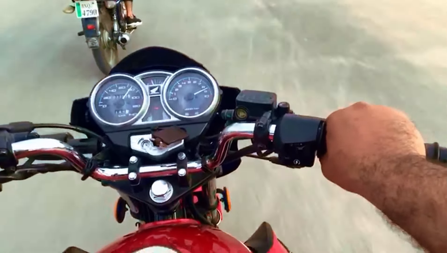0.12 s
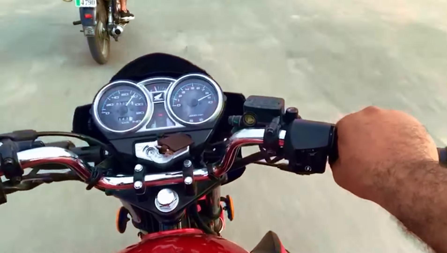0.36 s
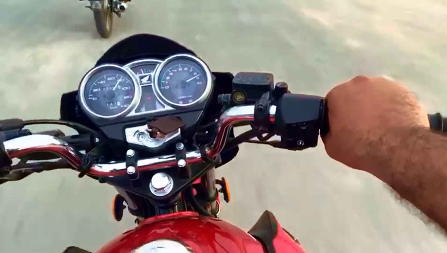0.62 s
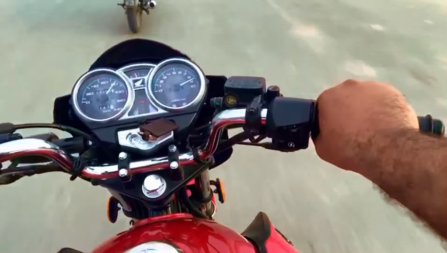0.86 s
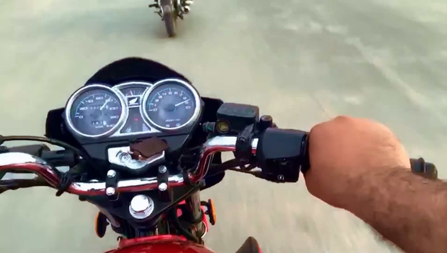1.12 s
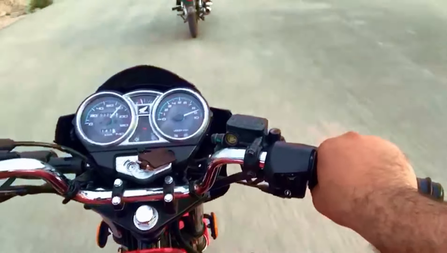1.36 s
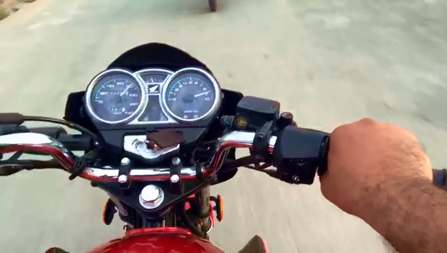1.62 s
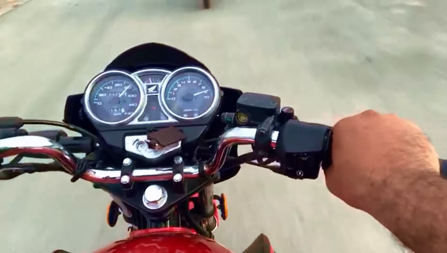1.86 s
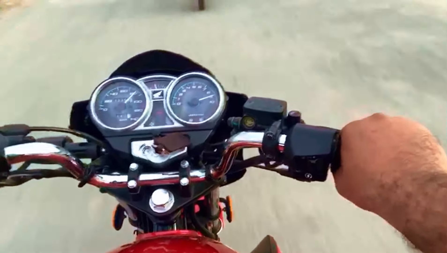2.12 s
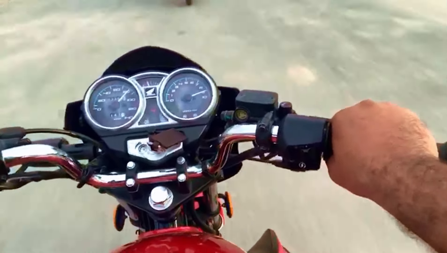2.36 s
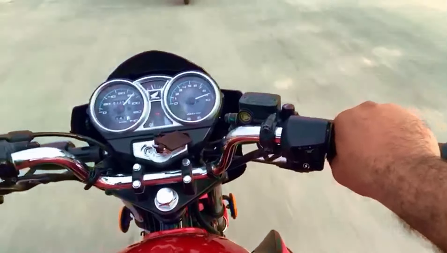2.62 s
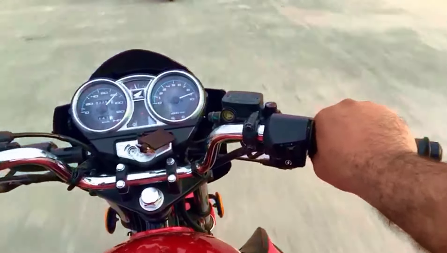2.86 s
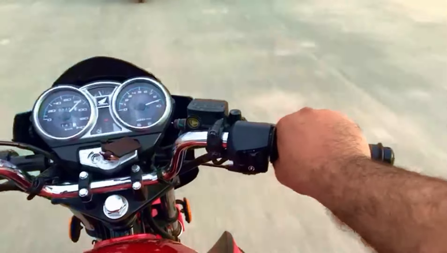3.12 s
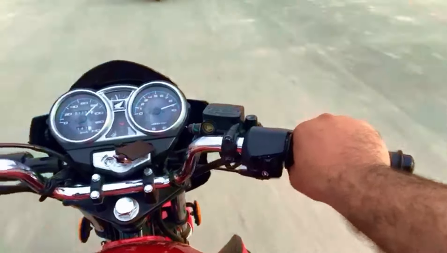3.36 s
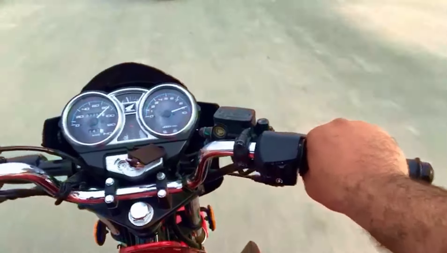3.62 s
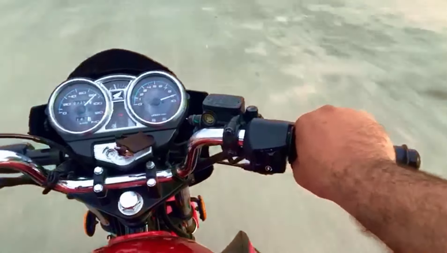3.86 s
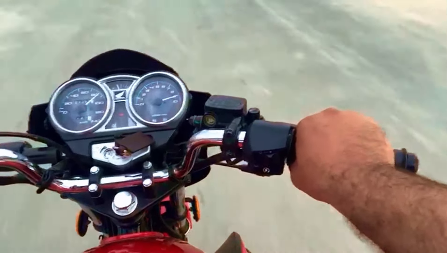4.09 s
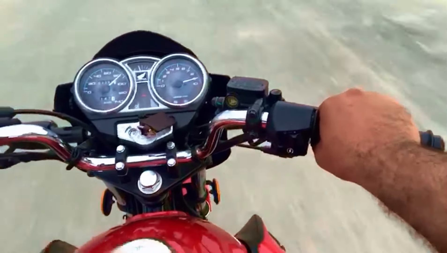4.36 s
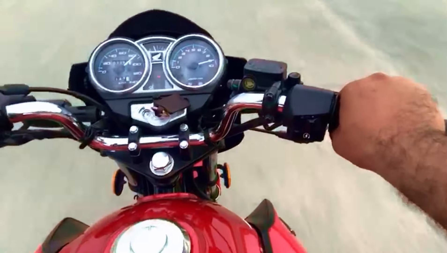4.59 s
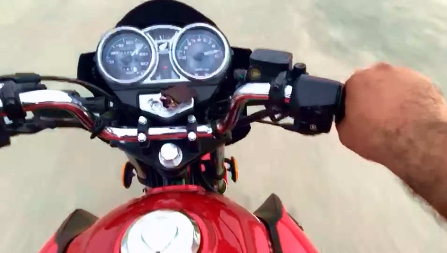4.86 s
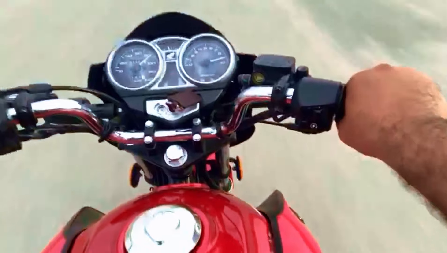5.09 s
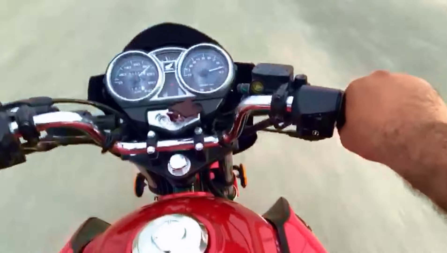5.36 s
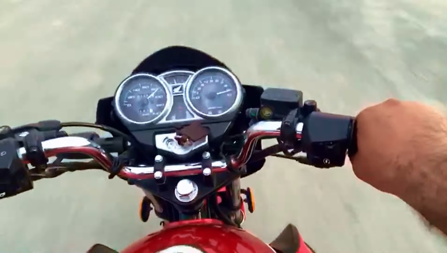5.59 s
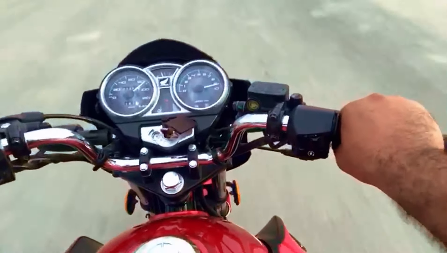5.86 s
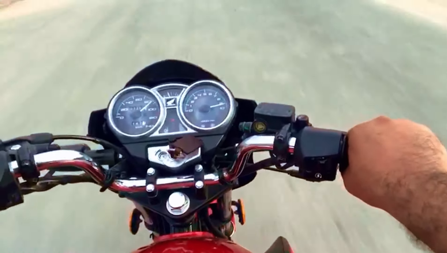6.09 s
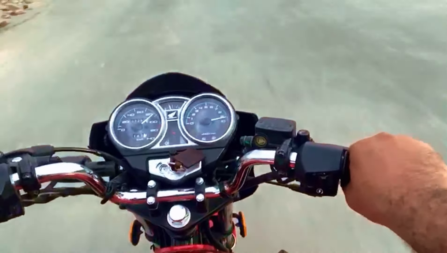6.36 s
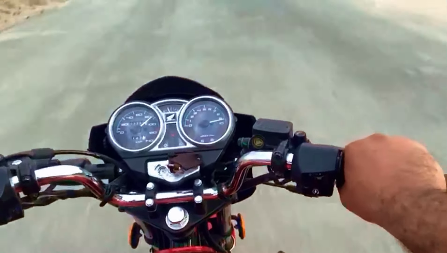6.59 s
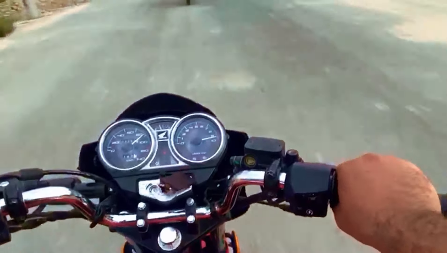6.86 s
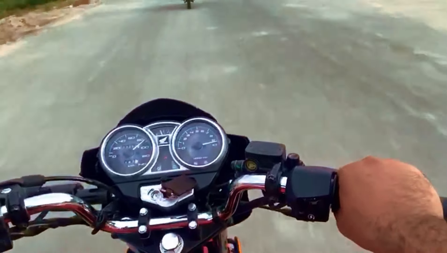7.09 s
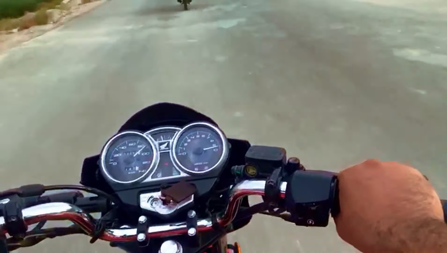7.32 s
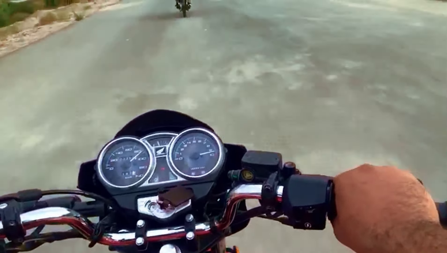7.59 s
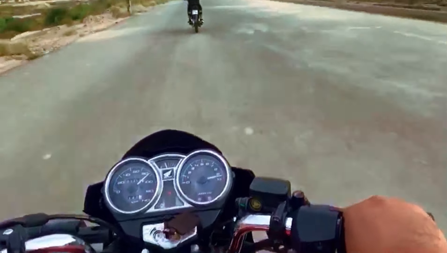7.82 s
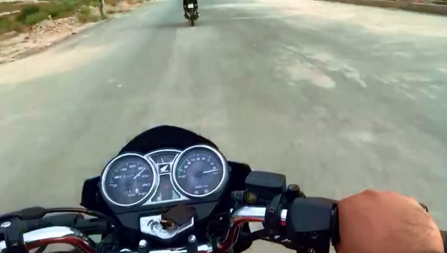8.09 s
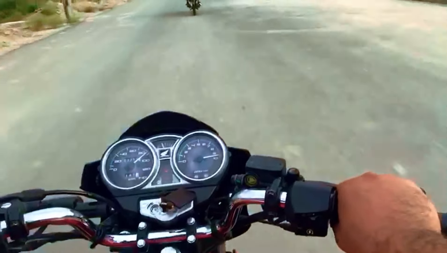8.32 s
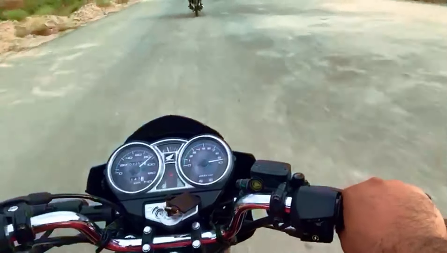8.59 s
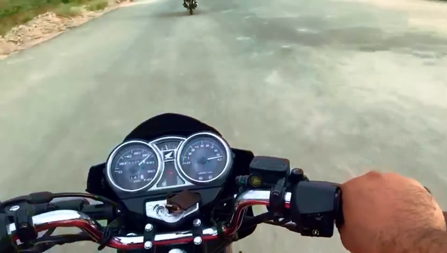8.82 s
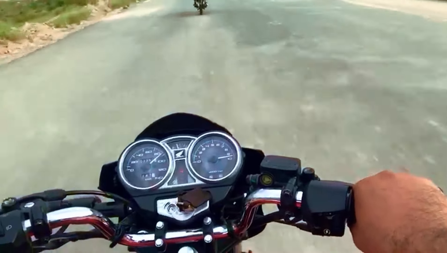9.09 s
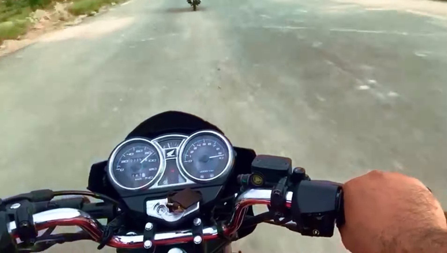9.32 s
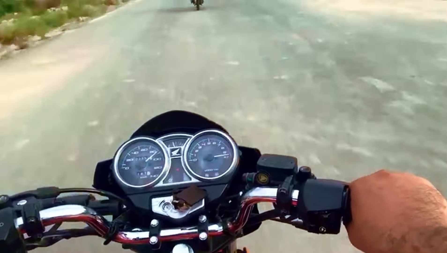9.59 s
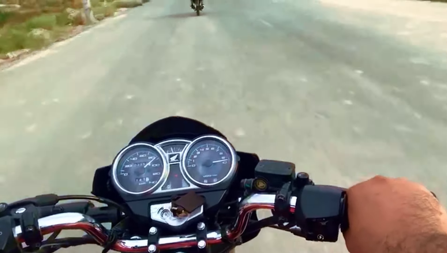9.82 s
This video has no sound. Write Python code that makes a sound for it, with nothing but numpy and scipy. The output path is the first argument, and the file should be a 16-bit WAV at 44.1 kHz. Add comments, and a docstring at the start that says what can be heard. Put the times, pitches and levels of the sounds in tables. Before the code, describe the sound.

A small single-cylinder motorcycle rides an open road, heard through a bare microphone on the rider, close and dry with no echo. From 0 to 0.3 s the air is calmer and the engine is clear: a low buzzing hum, throaty exhaust rasp and bright metallic clatter. At about 0.33 s wind slams in and covers most of it. From then on there is dense low rumble, irregular heavy thuds several times a second, a ragged fluttering roar, and small dry ticks and snaps, broken by very brief lulls. The engine drone climbs slightly and smoothly in pitch throughout, sinking further under the wind. Buffeting thumps hard around 4.6 s, and a brighter, stronger blast with a sharp snap arrives around 8.1 to 8.5 s. It eases a little, thuds again near 9 s, and continues rough to the end at about 10 s. Loud peaks sound flattened and overloaded, with dull extreme treble.

```python
"""On an open road, from an unshielded microphone on the rider of a small single-cylinder motorcycle.
At first the bright engine clatter is clear and the air calmer; within a third of a second it turns rough.
Then wind covers the ride: low rumble and heavy thuds, a ragged roar, eddies and ticks snapping at the port.
The engine hum, a stack of orders of the firing rate, slowly climbs and fades under it as speed is gained.
The wind is filtered noise in spurts, strongest a little after 8 s; a fast limiter squashes the peaks."""
import sys
import numpy as np
from scipy import signal
from scipy.fft import rfft, irfft, next_fast_len
from scipy.io import wavfile
from scipy.ndimage import uniform_filter1d, minimum_filter1d

SR = 44100
rng = np.random.default_rng(int(sys.argv[2]) if len(sys.argv) > 2 else 0)


def decibels_to_gain(level_db):
    """Convert a level in decibels to a linear amplitude gain (20 dB per decade)."""
    exponent = np.asarray(level_db, float) / 20
    return 10 ** exponent


def output_pcm(signal):
    """Save a mono or channel-first signal as 16-bit PCM at the path in sys.argv[1].

    Samples are clipped to [-1, 1] before scaling.
    """
    pcm = np.clip(np.atleast_2d(signal).T, -1, 1) * 32767
    wavfile.write(sys.argv[1], SR, np.round(pcm).astype(np.int16))


N = 438794
t = np.arange(N) / SR


def evened(x):
    """Scales to rms 1."""
    return x / np.sqrt(np.mean(x ** 2) + 1e-20)


def curve(rows):
    """Each column of a table, after its times in s, as a value for every sample."""
    s, *columns = np.transpose(rows)
    return [np.interp(t, s, c) for c in columns]


def colour(x, points, lo_hz=0, hi_hz=1e5):
    """Causal minimum-phase filter with a given spectrum, sloping off outside lo..hi; white noise stays at rms 1."""
    hz = np.abs(np.fft.fftfreq(16384, 1 / SR)) + 1
    f, db = np.transpose(points)
    gain = decibels_to_gain(np.interp(np.log(hz), np.log(f), db))
    gain = gain / (1 + (lo_hz / hz) ** 3) / (1 + (hz / hi_hz) ** 3)
    log_gain = np.log(np.maximum(gain, 1e-7))
    taps = np.fft.ifft(np.exp(np.conj(signal.hilbert(log_gain)))).real[:8192]
    return signal.oaconvolve(x, taps / np.linalg.norm(taps))[:N]


def flutter(lo_hz, hi_hz, slope):
    """Random wobble of rms 1 with rates between lo and hi, the slow ones stronger."""
    hz = np.fft.rfftfreq(N, 1 / SR) + 1e-3
    shape = hz ** -slope / (1 + (lo_hz / hz) ** 4) / (1 + (hz / hi_hz) ** 2)
    return evened(irfft(rfft(rng.standard_normal(N)) * shape, N))


def spells(start_length, heights, edge_s):
    """Plateaus of the given heights with soft edges."""
    steps = np.zeros(N + 1)
    for (s, length), height in zip(start_length, heights):
        start, end = min(round(s * SR), N), min(round((s + length) * SR), N)
        steps[start:end] += height
    edge = max(round(edge_s * SR), 1)
    return uniform_filter1d(uniform_filter1d(steps[:N], edge), edge)


def scattered(per_s, spread_db):
    """Random moments after the calmer start, each with a random lift of rms spread_db."""
    draw = rng.random((round(per_s * N / SR), 2))
    moments = .33 + draw[:, 0] * (N / SR - .4)
    lifts_db = spread_db * (2 * draw[:, 1] - 1) * np.sqrt(3)
    return zip(moments, lifts_db)


def hum(rate, turns):
    """Clean orders of the firing rate; a panel lifts each order that passes through its resonance."""
    # orders: multiple of the firing rate, level_db
    orders = [(1, -4), (2, 1), (3, -8), (4, -4), (5, -10), (6, -12), (7, -10), (9, -18), (10, -19),
              (13, -18), (15, -18)]
    # panel resonance: pitch_hz, width_hz, lift_db
    panel_hz, width_hz, lift_db = (335, 5, 9)
    out = np.zeros(N)
    for k, db in orders:
        lift = lift_db / (1 + ((k * rate - panel_hz) / width_hz) ** 2)
        out += decibels_to_gain(db + lift) * np.cos(2 * np.pi * (k * turns + rng.random()))
    return np.sqrt(2) * out


def rasp(turns):
    """Exhaust rasp: gas leaves in one noisy puff a firing."""
    # exhaust level: time_s, level_db
    rasp_level = [(0, -26), (.3, -21.5), (.5, -30), (3, -31.5), (6, -36.5), (9.95, -37.5)]
    # exhaust colour: pitch_hz, density_db (per Hz)
    rasp_colour = [(250, -18), (500, 3), (900, 3), (1400, -3.5), (1800, -11), (2600, -42.5)]
    puffs = (.5 + np.exp(-(turns % 1) / 0.2)) * rng.standard_normal(N)
    return decibels_to_gain(curve(rasp_level)[0]) * colour(evened(puffs), rasp_colour)


def clatter(turns):
    """Valve and exhaust clatter: noise puffed out twice a firing, and a casing mode struck at each firing."""
    # clatter level: time_s, level_db
    clatter_level = [(0, -42), (.295, -42), (.33, -52), (.6, -55), (2, -58), (4, -61), (9.95, -61)]
    # clatter colour: pitch_hz, density_db (per Hz)
    clatter_colour = [(1200, -30), (2200, -7), (3200, -4), (3750, 1), (4200, -3), (5500, -2), (7200, 0),
                      (8400, -1.5), (11500, -1), (12500, -30)]
    # casing mode: pitch_hz, width_hz, level_db (against the puffs)
    ring_hz, width_hz, ring_db = (6300, 170, -9)
    first = .9 * np.exp(-(turns % 1) / .2)
    second = .5 * np.exp(-((turns + .5) % 1) / .2)
    puffs = (1 + first + second) * rng.standard_normal(N)
    knocks = np.exp(-(turns % 1) / .04) * (np.cos(2 * np.pi * ring_hz * t) + 3 * rng.standard_normal(N))
    r = np.exp(-np.pi * width_hz / SR)
    ring = signal.lfilter([1], [1, -2 * r * np.cos(2 * np.pi * ring_hz / SR), r * r], knocks)
    mixed = colour(evened(puffs), clatter_colour) + decibels_to_gain(ring_db) * evened(ring)
    return decibels_to_gain(curve(clatter_level)[0]) * mixed


def engine():
    """One cylinder whose firing rate climbs slowly, driving hum, rasp and clatter together."""
    # engine speed: time_s, firing_rate_hz, hum_level_db
    speed = [(0, 66.7, -24), (.5, 67.5, -26), (1, 67.9, -26), (2, 69.3, -29), (7, 73.7, -29),
             (8, 74.5, -31), (9.95, 75.6, -31)]
    rate, hum_db = curve(speed)
    turns = np.cumsum(rate) / SR  # counted in firings
    waver_db = 2.5 * flutter(1.5, 12, .4) - 1
    return decibels_to_gain(hum_db + waver_db) * hum(rate, turns) + rasp(turns) + clatter(turns)


def wind():
    """Drives in dB for rumble, roar, brightness and hiss: the air stream, plus gusts and surges, with lulls."""
    # air stream past the rider: time_s, strength_db (against the usual)
    stream = [(0, 3), (.3, 1), (.8, 1.5), (1.1, 0.5), (2.2, 1), (3.2, 2.5), (3.6, 2), (4.9, 0), (5.3, 3),
              (5.6, 0.5), (7.4, 2), (7.9, 1), (8.2, 7), (8.4, 5.5), (8.55, 1), (8.8, 2), (9.95, 2.5)]
    # gusts that tear at the port: start_s, length_s, roar_db, brightness_db
    gusts = np.array([(0.306, 0.11, -23.5, -45), (0.452, 0.058, -23.5, -44), (0.546, 0.063, -23, -43),
                      (0.712, 0.21, -24, -45), (0.99, 0.037, -13.5, -29.5), (1.141, 0.079, -26, -41),
                      (1.287, 0.083, -20.5, -43), (1.398, 0.039, -21.5, -43), (1.452, 0.032, -21, -33),
                      (1.492, 0.07, -15, -30), (1.724, 0.11, -17.5, -34), (1.872, 0.069, -20, -38),
                      (2.016, 0.063, -21, -36), (2.126, 0.036, -22, -46), (2.234, 0.068, -22, -42),
                      (2.365, 0.069, -23, -47), (2.532, 0.045, -20.5, -31), (2.69, 0.035, -18.5, -36),
                      (2.828, 0.11, -20.5, -34), (2.968, 0.12, -22.5, -35), (3.113, 0.058, -21.5, -34),
                      (3.18, 0.093, -20.5, -39), (3.328, 0.058, -19, -32), (3.429, 0.052, -23, -39),
                      (3.731, 0.057, -17, -28), (4.057, 0.053, -18, -33), (4.245, 0.032, -28, -42),
                      (4.52, 0.043, -25, -45), (4.608, 0.044, -24, -52), (4.69, 0.026, -22, -46),
                      (4.936, 0.04, -16.5, -34), (5.095, 0.079, -21.5, -40), (5.358, 0.068, -27, -38),
                      (5.727, 0.055, -19.5, -30), (5.813, 0.035, -17.5, -31.5), (5.957, 0.04, -24.5, -39),
                      (6.021, 0.069, -28, -43), (6.237, 0.14, -23, -33.5), (6.474, 0.055, -20.5, -33.5),
                      (6.73, 0.07, -23.5, -38), (6.865, 0.047, -20.5, -34), (6.958, 0.063, -24, -38),
                      (7.126, 0.065, -20, -33), (7.377, 0.036, -20, -30), (7.513, 0.047, -20.5, -32),
                      (7.612, 0.032, -24, -37), (7.767, 0.051, -14, -27), (7.841, 0.52, -21, -30.5),
                      (8.401, 0.024, -15.5, -27), (8.622, 0.029, -21.5, -36), (8.749, 0.056, -21, -34),
                      (8.892, 0.061, -25, -37), (8.991, 0.026, -23.5, -41), (9.061, 0.021, -21, -38),
                      (9.184, 0.048, -18, -25.5), (9.356, 0.055, -25, -44), (9.439, 0.064, -19.5, -33),
                      (9.59, 0.064, -28.5, -46), (9.805, 0.061, -26, -42)])
    # surges of rumble: start_s, length_s, rumble_db
    surges = np.array([(0.229, 0.034, -14), (0.32, 0.106, -4), (0.456, 0.04, -7), (0.54, 0.32, -12.5),
                       (0.873, 0.156, -14), (1.148, 0.09, -9.5), (1.324, 0.045, -11), (1.425, 0.167, -13),
                       (1.715, 0.11, -23), (1.86, 0.062, -12), (2.017, 0.092, -18), (2.352, 0.12, -13),
                       (2.68, 0.078, -14), (2.837, 0.034, -21), (2.986, 0.182, -13), (3.326, 0.044, -17),
                       (3.421, 0.021, -14), (3.614, 0.056, -15), (3.728, 0.032, -16), (4.15, 0.046, -17),
                       (4.267, 0.026, -14), (4.329, 0.03, -16), (4.435, 0.054, -16), (4.536, 0.037, -10),
                       (4.626, 0.039, -5), (4.856, 0.041, -21), (5.004, 0.048, -15.5), (5.114, 0.054, -7),
                       (5.216, 0.076, -16.5), (5.334, 0.136, -14.5), (5.556, 0.026, -7),
                       (5.762, 0.086, -17), (5.87, 0.11, -17), (6.144, 0.29, -12), (6.51, 0.03, -16),
                       (6.622, 0.05, -17), (6.74, 0.092, -16), (6.863, 0.038, -12), (6.927, 0.1, -11),
                       (7.13, 0.078, -11.5), (7.288, 0.084, -19), (7.39, 0.032, -15), (7.576, 0.082, -13),
                       (7.727, 0.1, -24), (8.008, 0.11, -20), (8.257, 0.134, -13), (8.47, 0.088, -13),
                       (8.61, 0.044, -19), (8.724, 0.087, -13), (9.018, 0.073, -10.5), (9.217, 0.084, -14),
                       (9.35, 0.032, -19), (9.43, 0.023, -9), (9.546, 0.078, -13.5), (9.75, 0.048, -10),
                       (9.91, 0.03, -7)])
    # lulls, when the stream leaves the port: start_s, length_s, change_db (a few are lifts)
    lulls = np.array([(0.509, 0.028, -2), (1.046, 0.072, -1), (1.242, .04, 0), (1.58, .035, -5),
                      (1.666, 0.034, -1.5), (1.828, 0.032, -4.5), (1.96, .03, 4.5), (2.086, 0.035, -6),
                      (3.32, 0.038, 2), (3.834, 0.026, -5), (4.134, 0.038, -7), (4.201, 0.04, -4),
                      (4.564, 0.026, -4.5), (4.8, 0.032, -7), (4.907, .025, -2), (5.153, 0.023, -9),
                      (5.544, 0.027, -1), (5.584, 0.016, -2), (6.116, 0.045, -1.5), (6.45, 0.045, -1),
                      (6.719, 0.016, -10), (6.902, .03, -5), (7.198, .035, -8), (8.52, 0.048, -2.5),
                      (8.68, 0.024, -4), (9.1, .02, -4), (9.398, 0.034, -5.5), (9.721, 0.028, -7)])
    # usual drive in dB, and dB gained for each dB of stream strength
    rumble_law, roar_law = (-15.5, 0.31), (-22, 1.05)
    bright_law, hiss_law = (-41.5, 1.8), (-59.5, 2.2)
    gust_edge_s, surge_edge_s, lull_edge_s = 0.0094, 0.027, .012
    rumble_share, bright_share = 0.49, 1.6  # of each lull's change

    strength_db = curve(stream)[0]
    lull_db = spells(lulls[:, :2], lulls[:, 2], lull_edge_s)

    def level(law, rows, column, edge_s):
        """Steady stream and its spells, added as amplitudes."""
        steady = decibels_to_gain(law[0] + law[1] * strength_db)
        return 20 * np.log10(steady + spells(rows[:, :2], decibels_to_gain(rows[:, column]), edge_s))

    rumble_db = level(rumble_law, surges, 2, surge_edge_s) + rumble_share * lull_db
    roar_db = level(roar_law, gusts, 2, gust_edge_s) + lull_db
    bright_db = level(bright_law, gusts, 3, gust_edge_s) + bright_share * lull_db
    calm_db = 20 * np.clip((.33 - t) * 20, 0, 1)  # the hiss sets in as the air turns rough
    hiss_db = hiss_law[0] + hiss_law[1] * strength_db - calm_db
    return rumble_db, roar_db, bright_db, hiss_db


def thuds():
    """Heavy buffets: each a low pressure swing that grows, then dies within about three cycles."""
    # buffets: start_s, level_db, swing_hz
    buffets = [(0.325, -2, 124), (0.452, 0, 196), (0.549, -5, 116), (0.984, 3, 66), (1.149, -8, 143),
               (1.319, 3, 137), (1.419, -2, 141), (1.638, -1, 101), (1.871, -7, 61.9), (2.029, -1, 58.3),
               (2.378, -2, 59), (2.83, 1.5, 155), (2.985, -4, 65.6), (3.334, 2.5, 102), (3.415, 0, 62.4),
               (3.605, 2, 69), (3.704, -6, 72), (3.84, -1, 54.7), (3.96, 3, 160), (4.182, 2, 69),
               (4.256, -8, 75.4), (4.622, 6, 70.3), (4.702, 1, 68.3), (4.852, -6, 51.5), (5.116, -4, 83.4),
               (5.33, 0, 62), (5.557, -2, 66.3), (5.757, -1, 62.5), (6.312, -6, 70.5), (6.491, -7, 70.0),
               (6.616, -15, 80.7), (6.731, 3, 202), (6.854, -2, 135), (7.127, -3, 161), (7.238, -12, 64),
               (7.389, 3, 93), (7.561, -6, 128), (7.718, -6, 65), (8.582, -7, 57), (8.732, -10, 64),
               (8.888, -3, 59.2), (9.05, 6, 71), (9.197, -14, 51.1), (9.425, -3, 96), (9.537, -7, 54.7),
               (9.748, -12, 62.3)]
    out = np.zeros(N)
    for s, level_db, hz in buffets:
        u = np.arange(int(3.2 * SR / hz)) * hz / SR  # in cycles
        swing = np.sin(2 * np.pi * u) * u * np.exp(-u / 0.71)
        part = out[round(s * SR):][:len(u)]
        part += 1.5687 * decibels_to_gain(level_db) * swing[:len(part)]
    return out


def rumble(spurts, rumble_db):
    """Large slow vortices heard as lumpy low noise, with the single heavy thuds."""
    # rumble colour: pitch_hz, density_db (per Hz)
    rumble_colour = [(11, -17), (18, -39.5), (42, 0.5), (64, -0.5), (285, -9.5), (400, -13), (520, -36.5),
                     (880, -120)]
    slow_spurts = uniform_filter1d(spurts, size=600)
    lumps_db = rumble_db - 5.0 + 3.87 * flutter(15.3, 43, 0.13) + 1.7 * slow_spurts
    return decibels_to_gain(lumps_db) * colour(rng.standard_normal(N), rumble_colour, hi_hz=229.0) + thuds()


def eddies():
    """Pressure envelopes of eddies bursting at the port, for middle and treble: quick swell, slower fall."""
    # bursts: time_s, middle_db, treble_db (strengths ahead of the band weights), fall_ms
    bursts = [(0.015, -12, -31, 6), (0.034, -17, -28, 5.5), (0.162, -4, -35, 8.9), (0.227, -1.5, -22, 7.6),
              (0.34, -3, -27, 5.5), (0.362, -1, -35, 4.5), (0.391, 3, -35, 6.4), (0.472, -8, -35, 6),
              (0.54, -12, -39, 6), (0.579, -10, -32, 5.4), (0.614, -2, -36, 6.4), (0.7, -5, -33, 6.6),
              (0.773, -2, -22, 4), (0.808, -6, -34, 6), (0.837, -8, -33, 6), (1.0, -11, -21, 6.7),
              (1.142, 1, -30, 7.7), (1.184, -9, -39, 6), (1.291, -11, -35, 5.5), (1.326, -9, -32, 6),
              (1.424, -9, -35, 6), (1.457, -13, -33, 5.1), (1.506, -6, -26, 6), (1.539, -5, -35, 6),
              (1.621, -4, -32, 8.3), (1.758, -2, -29, 8.8), (1.794, -2, -22, 6), (1.884, 3, -29, 5.6),
              (1.913, -14, -34, 6), (1.983, -15, -36, 5.1), (2.055, -3, -30, 6), (2.141, -6, -33, 5.6),
              (2.363, -13, -35, 6), (2.535, -8, -25, 5.4), (2.591, -9, -35, 7.5), (2.689, -12, -34, 5.5),
              (2.841, -4, -29, 11), (2.932, -5, -38, 6), (2.966, -7, -38, 4.3), (2.991, -7, -32, 7.4),
              (3.068, -13, -32, 6), (3.25, -11, -42, 5.1), (3.354, 3, -24, 8), (3.432, -12, -37, 5.5),
              (3.58, -5, -37, 6), (3.748, -13, -35, 4.8), (3.888, -8, -28, 8.8), (4.001, -13, -33, 6),
              (4.068, -17, -36, 4.8), (4.173, -9.5, -35, 6.5), (4.258, -9, -32, 4.6), (4.329, -9, -38, 6),
              (4.465, -5, -35, 4.9), (4.636, -12, -33, 6), (4.696, -9, -37, 6), (4.944, -10, -31, 6),
              (5.094, -14, -37, 5.5), (5.122, -12, -33, 4.9), (5.144, -3, -33, 6), (5.206, -4, -25.5, 7.6),
              (5.288, -7, -28, 5.3), (5.387, -4, -29, 6), (5.444, -1.5, -26, 6.5), (5.511, -12, -39, 6.7),
              (5.562, -5, -28, 8.4), (5.633, -2, -33, 3.8), (5.688, -2, -34, 6), (5.734, -11, -32, 6.7),
              (5.828, -12, -34, 5.5), (5.929, -10, -29, 5), (5.97, -3, -33, 5), (6.022, -5.5, -39, 4.9),
              (6.065, -13, -40, 5.1), (6.238, -6, -41, 5.2), (6.309, 0, -22, 6), (6.34, 1, -22, 10),
              (6.365, -5, -27, 4.6), (6.435, -9, -30, 6), (6.496, -3, -37, 6), (6.517, 0, -24, 6.6),
              (6.735, -6, -26, 6.7), (6.806, -10, -34, 6), (6.876, -2, -18, 6.5), (6.954, -10, -35, 4.4),
              (6.99, -5, -28, 8.1), (7.127, -3, -31, 6), (7.171, -4, -28, 6), (7.256, -13, -42, 6),
              (7.317, -6, -36, 5.5), (7.382, -17, -35, 5.6), (7.457, -6, -33, 6), (7.512, -12, -33, 5.3),
              (7.578, -8, -37, 6), (7.623, 1, -22, 5), (7.689, -3, -25, 6), (7.789, -3, -26, 4.7),
              (7.883, -6, -32, 6), (8.022, 0, -22, 7.8), (8.1, -15, -29, 3.4), (8.136, -1, -24, 6.8),
              (8.235, -7, -32, 6), (8.279, -5, -30, 6), (8.332, -5, -33, 6), (8.416, -2, -25, 5),
              (8.595, -3.5, -25, 9.9), (8.675, -5, -34, 4.6), (8.727, -6, -38, 6), (8.805, -5, -30, 6.3),
              (8.896, -11, -30, 5.3), (8.944, 0, -26, 7), (8.983, -17, -35, 5.5), (9.064, -10, -35, 6),
              (9.128, -8, -34, 6), (9.188, -6.5, -26, 6.6), (9.255, -9, -34, 7.2), (9.359, -12, -33, 6),
              (9.486, -8, -30, 6), (9.542, -6, -28, 6), (9.775, -8, -35, 5), (9.806, -5, -30, 6.6),
              (9.891, -5, -36, 4.9)]
    # the many lesser ones: rate_per_s, middle_db, treble_db, fall_ms, spread_db
    per_s, small_db, small_treble_db, small_ms, spread_db = (5, -15, -42, 6, 4.0)
    small = [(s, small_db + db, small_treble_db + db, small_ms) for s, db in scattered(per_s, spread_db)]
    middle, treble = np.zeros((2, N))
    for s, middle_db, treble_db, ms in list(bursts) + small:
        at = max(round((s - .002) * SR), 0)  # the swell begins 2 ms ahead
        u = t[:min(2000, N - at)] * 1000  # in ms
        middle[at:at + len(u)] += decibels_to_gain(middle_db) * (1 - np.exp(-(u / 1.53) ** 2)) * np.exp(-u / ms)
        treble[at:at + len(u)] += decibels_to_gain(treble_db) * (1 - np.exp(-(u / 1.4) ** 2)) * np.exp(-u / (1.25 * ms))
    return middle, treble


def ticks():
    """Sharp ticks at the port: about one cycle of pressure under a short bell, with a noisy snap on it."""
    # single ticks: start_s, level_db, edge_db (against the tick)
    sharp = [(0.3395, -13, -10), (0.4698, -26, -14), (0.5643, -19, -17), (0.7718, -10.5, -21),
             (0.8064, -19.5, -15), (1.1428, -19, -9), (1.348, -18, -13), (1.6217, -23, -6),
             (1.7258, -19.5, -19), (1.8065, -15, -15), (2.3422, -17, -19), (2.3624, -18, -19),
             (2.5345, -10, -10), (2.8457, -12, -9), (3.8876, -18, -13), (4.003, -21, -12),
             (4.1731, -28, -5), (4.2608, -19, -16), (4.6684, -19.5, -14), (5.1448, -12.5, -9),
             (5.2055, -21, -9), (5.5605, -9, -23), (5.6328, -16.5, -17), (5.6894, -15.5, -21),
             (5.726, -20, -15), (5.9288, -13, -15), (5.95, -17, -9), (5.9693, -18, -7), (6.0219, -19, -11),
             (6.4936, -12, -13), (6.8054, -18, -9), (6.868, -14, -8), (6.9888, -20, -2), (7.1283, -14, -13),
             (7.3823, -26, -14), (7.513, -19, -12), (7.6234, -13, -15), (7.652, -18, -13), (7.833, -14, -4),
             (8.0972, -29, -12), (8.1355, -3, -3), (8.2342, -24, -10), (8.3316, -18, -4), (8.627, -18, -9),
             (8.6758, -16, -12), (8.806, -13, -14), (8.835, -17.5, -8), (8.8861, -16.5, -5.5),
             (8.984, -20, -7), (9.064, -24, -9), (9.1284, -27, -16), (9.1807, -21, -14), (9.1982, -10, -14),
             (9.775, -19, -14), (9.8096, -19.5, -5)]
    # the many fainter ones: rate_per_s, level_db, edge_db, spread_db
    per_s, small_db, small_edge_db, spread_db = (8.5, -26.5, -10.5, 2.5)
    rows = list(sharp) + [(s, small_db + db, small_edge_db) for s, db in scattered(per_s, spread_db)]
    out = np.zeros(N)
    u = t[:100] - t[40]  # s from the middle of the tick
    for s, level_db, edge_db in rows:
        cycles = 2700 * u * np.exp(.15 * rng.standard_normal())
        wave = np.sin(2 * np.pi * cycles) + 2.1 * np.sin(.9 * np.pi * cycles)
        body = wave * np.exp(-(u / 0.00029) ** 2)
        noise = uniform_filter1d(rng.standard_normal(len(u)), size=3)
        edge = decibels_to_gain(edge_db) * 2 * np.gradient(noise) * np.exp(-(u / .0003) ** 2)
        out[round(s * SR):][:len(u)] += decibels_to_gain(level_db) * (body + edge)
    return out


def roar(spurts, roar_db, bright_db, hiss_db):
    """Turbulence at the port: five bands share one noise and one pattern of spurts, each swayed to its own
    depth, plus a hiss."""
    # roar colour: pitch_hz, density_db (per Hz)
    roar_colour = [(88, -42.5), (150, 0.5), (290, -2), (468, -5), (1050, -11.5), (6440, -37.5),
                   (11200, -53), (12000, -55), (15600, -123), (22000, -120)]
    ragged = np.interp(t, [.28, .33], [.45, 1])  # the air is calmer in the first moments
    air = rng.standard_normal(N)
    spurts = ragged * spurts
    snaps = ragged * flutter(60, 1340, 0.23)
    middle, treble = eddies()

    low = decibels_to_gain(roar_db - 3.0 + 2.4 * spurts + 2.65 * flutter(23, 72, 0.55)) + 0.31 * middle
    mid = decibels_to_gain(roar_db - 4.5 + 3.15 * spurts + 4.82 * snaps) + 0.53 * middle
    upper = decibels_to_gain(bright_db - 2.5 + 3.44 * spurts + 3.55 * snaps + 2.46 * flutter(37, 400, 0.19))
    upper += 0.017 * middle + 1.3 * treble
    high = decibels_to_gain(bright_db - 17 + 4.5 * spurts + 4.9 * snaps + 3.2 * flutter(28, 300, 0.18))
    high += 0.62 * treble
    top = decibels_to_gain(1.02 * bright_db - 20 + 3.3 * spurts + 4.2 * snaps + 3.5 * flutter(28, 300, .2))
    top += 0.19 * treble
    hiss = decibels_to_gain(hiss_db + 1.2 * spurts + 0.86 * snaps) * rng.standard_normal(N)

    out = colour(low * air, roar_colour, 192, 704)
    out += colour(mid * air, roar_colour, 490, 2326)
    out += colour(upper * air, roar_colour, 1930, 3150)
    out += colour(high * air, roar_colour, 3440, 8000)
    out += colour(top * air, roar_colour, 6500)
    return out + colour(hiss, roar_colour, 4000)


def scene():
    """Engine and wind at one microphone; one pattern of spurts runs through rumble and roar."""
    spurts = flutter(9.2, 115, 0.32)
    rumble_db, roar_db, bright_db, hiss_db = wind()
    mix = engine() + rumble(spurts, rumble_db) + roar(spurts, roar_db, bright_db, hiss_db) + ticks()
    return mix[None]


def roll_off(x):
    """The treble ends steeply here."""
    return signal.sosfilt(signal.butter(12, 12170, fs=SR, output="sos"), x)


def record(dry):
    """Microphone: port ripple and low cut, a fast limiter that squashes the peaks, and a treble cut."""
    # microphone port response: pitch_hz, gain_db
    port = [(600, 0.5), (850, -3), (1300, -1.5), (2000, -1.5), (3000, 0), (4400, 5.5), (4850, 3.5),
            (6200, 2), (7300, -2), (8600, -2), (9500, -2), (10300, -7), (11000, -4.5), (11600, -4)]
    size = next_fast_len(N + SR // 4)
    hz = np.fft.rfftfreq(size, 1 / SR) + 1e-3
    f, db = np.transpose(port)
    low_cut = 1 / np.sqrt(1 + (37 / hz) ** 8)
    response = decibels_to_gain(np.interp(hz, f, db)) * low_cut
    heard = irfft(rfft(dry, size) * response, size)[:, :N]

    # the highest peak within about 3.4 ms either side, smoothed, sets the limiter's gain
    highest = -minimum_filter1d(-abs(heard), size=301, axis=1)
    peak = uniform_filter1d(highest, size=151, axis=1)
    held = heard / (1 + (peak / .97) ** 7) ** (1 / 7)

    treble_cut = signal.firwin(255, 11750, window=("kaiser", 8), fs=SR)
    return roll_off(signal.oaconvolve(held, treble_cut[None], "same"))


dry = scene()
out = record(dry)
output_pcm(out)
```